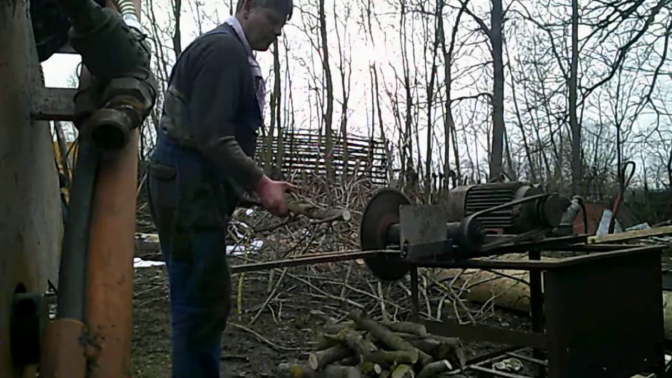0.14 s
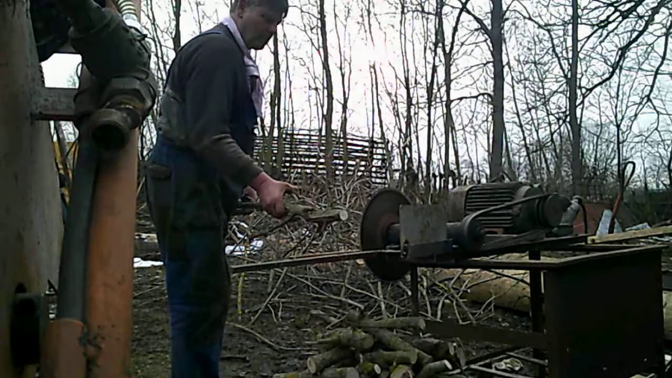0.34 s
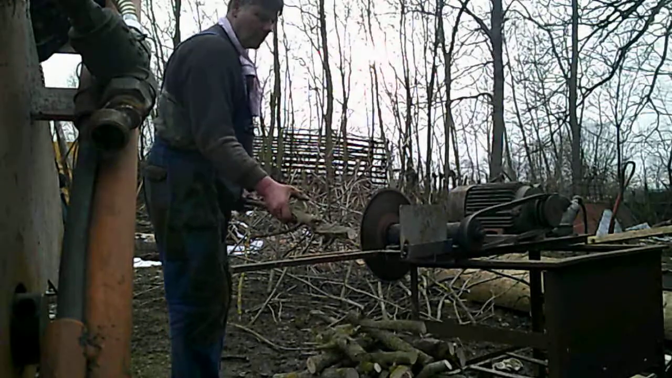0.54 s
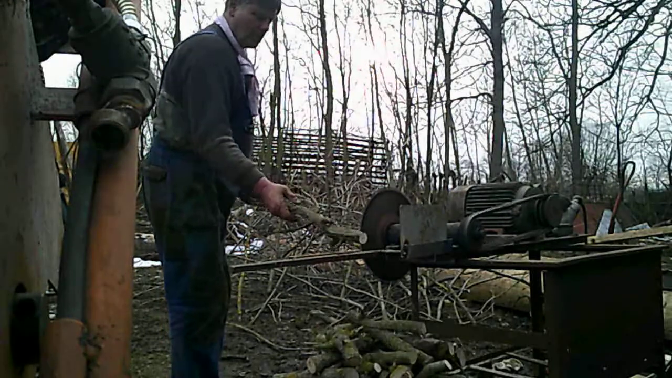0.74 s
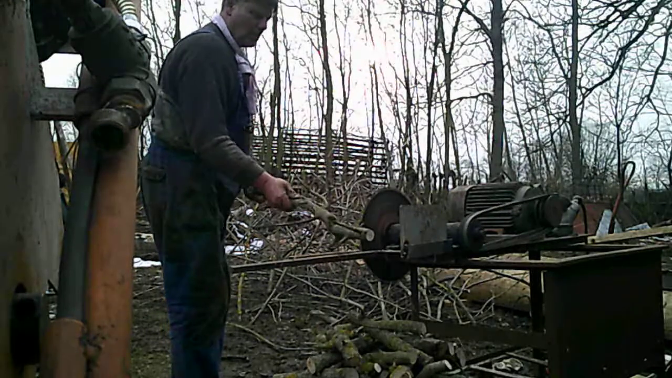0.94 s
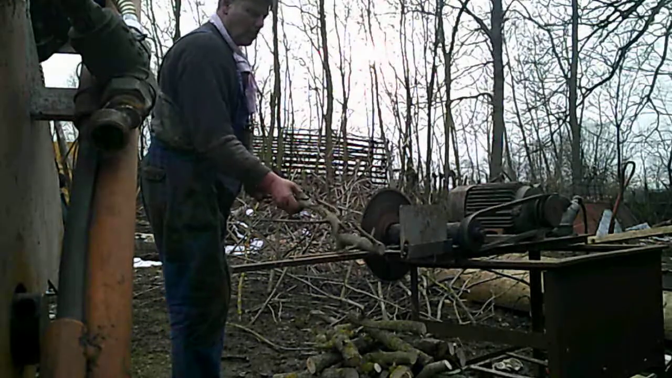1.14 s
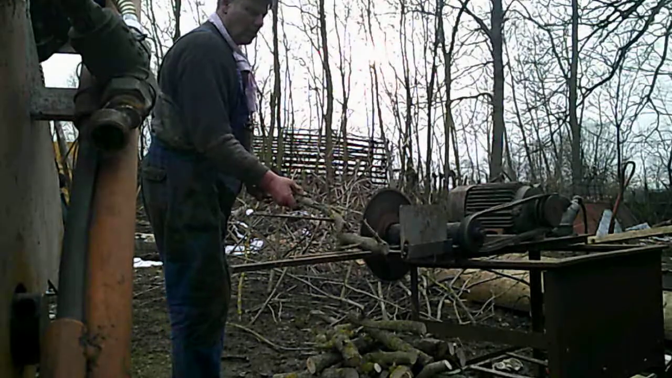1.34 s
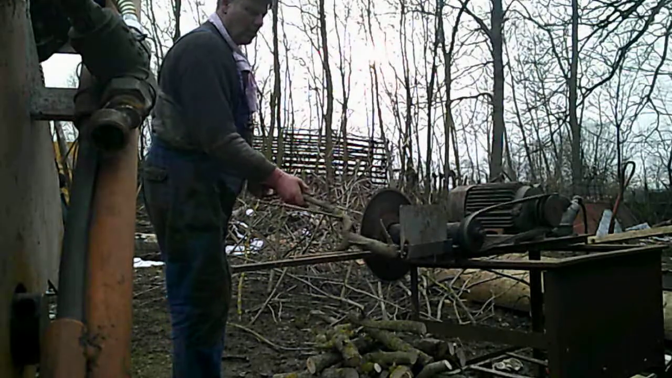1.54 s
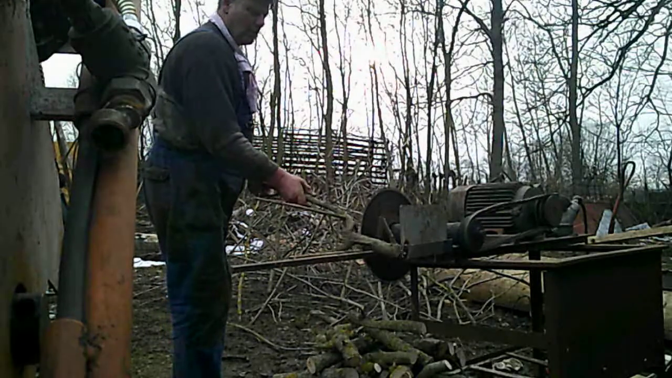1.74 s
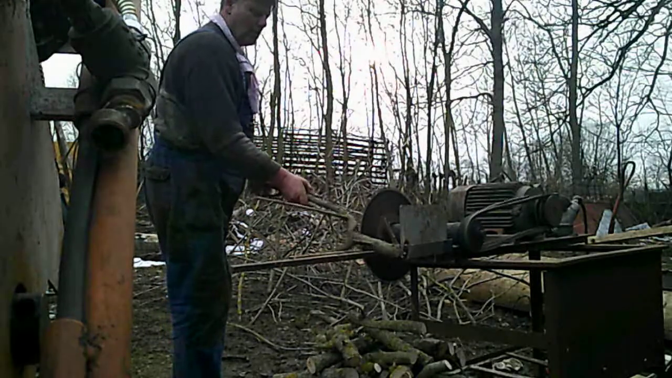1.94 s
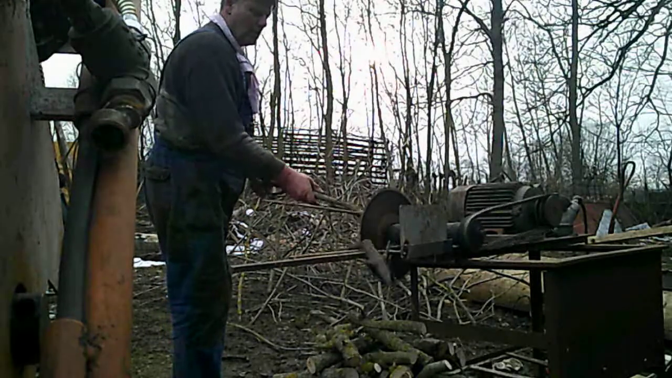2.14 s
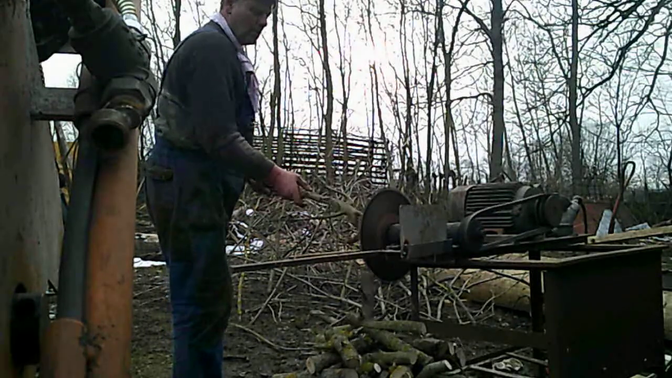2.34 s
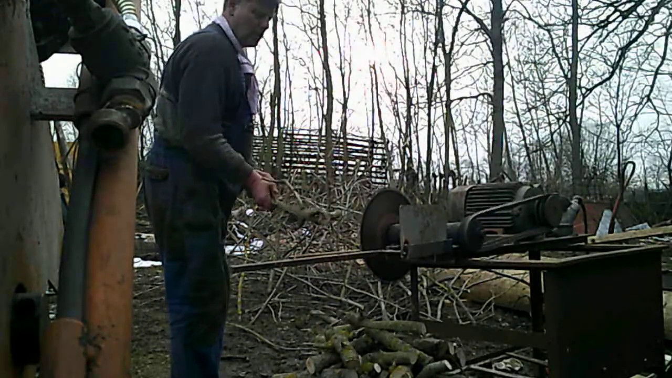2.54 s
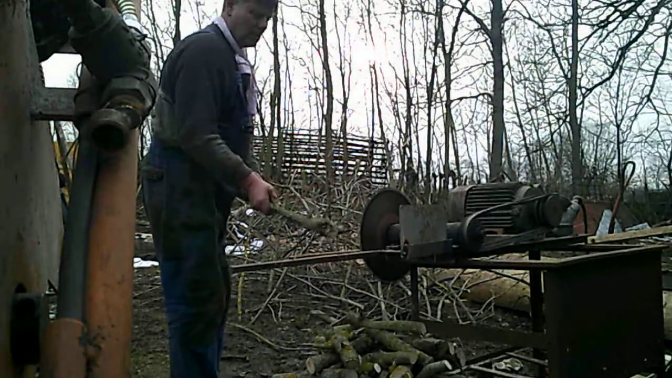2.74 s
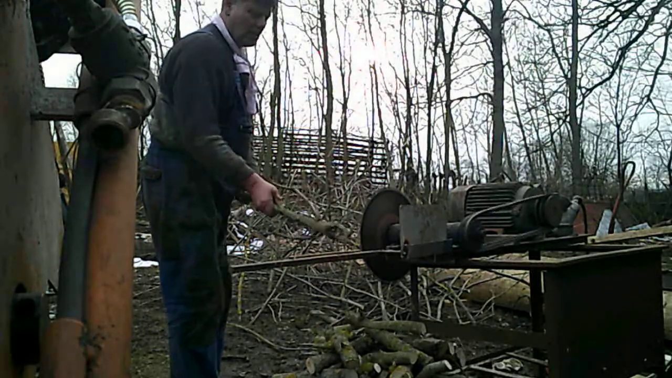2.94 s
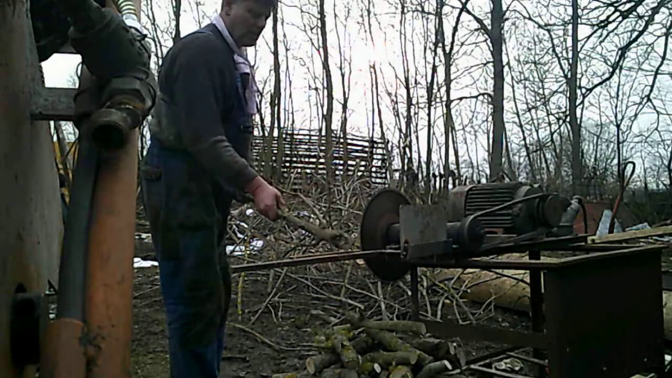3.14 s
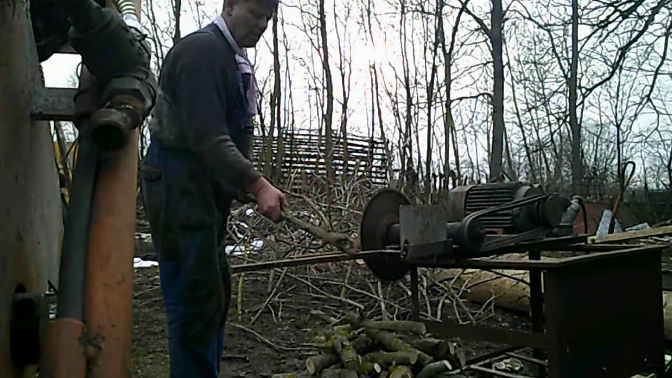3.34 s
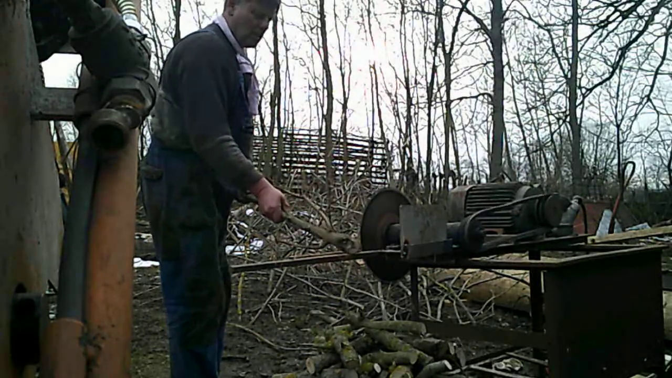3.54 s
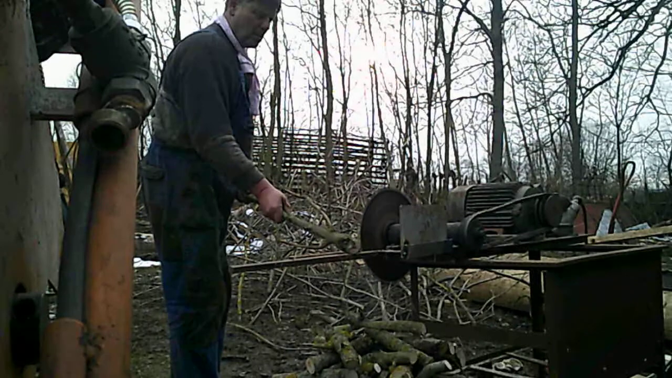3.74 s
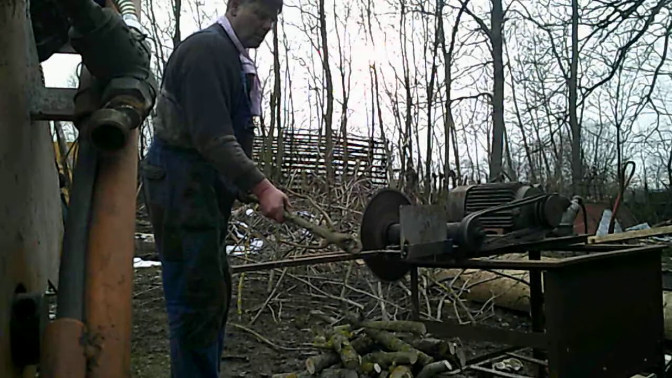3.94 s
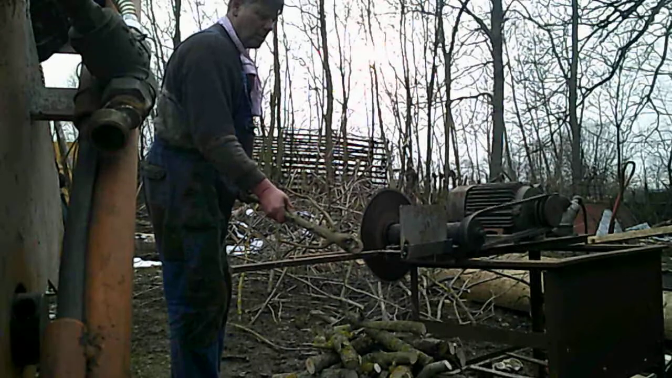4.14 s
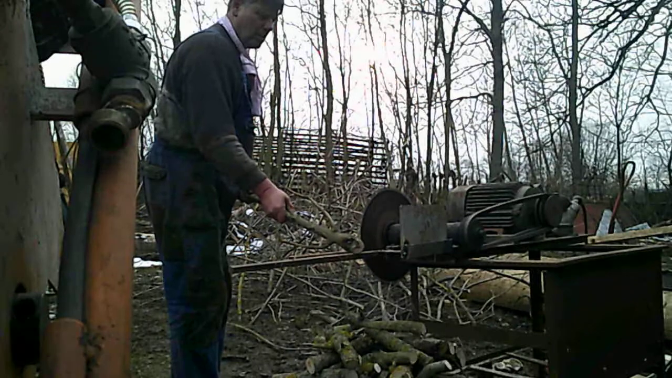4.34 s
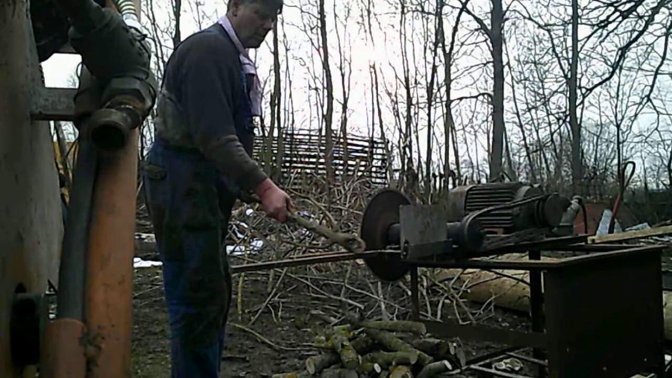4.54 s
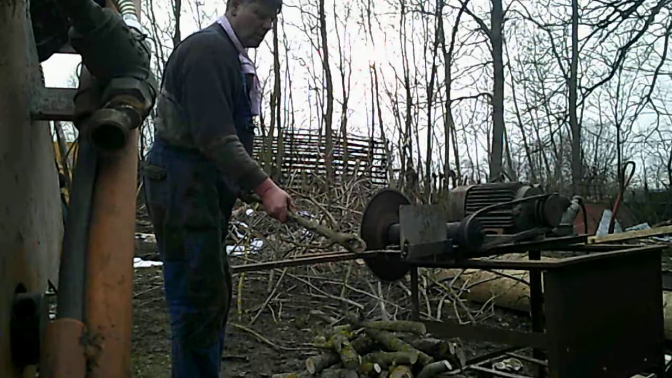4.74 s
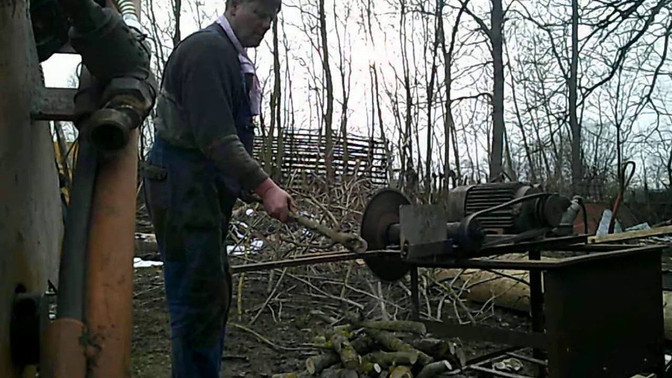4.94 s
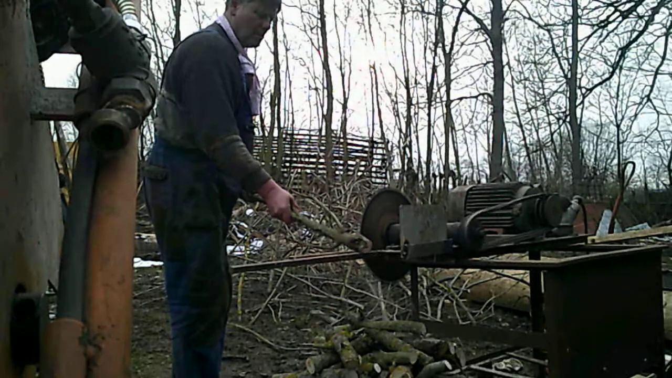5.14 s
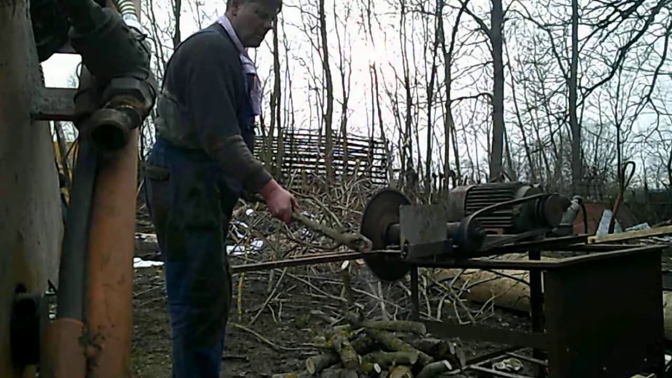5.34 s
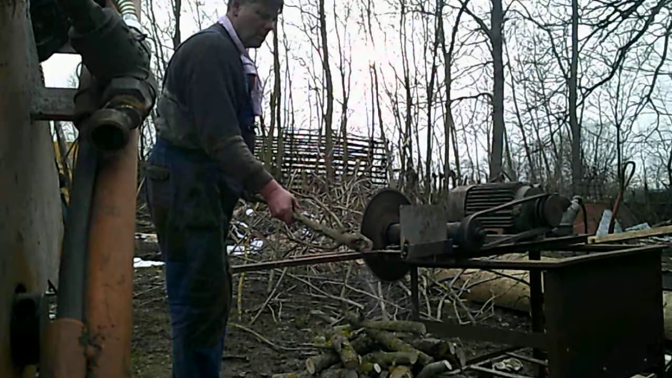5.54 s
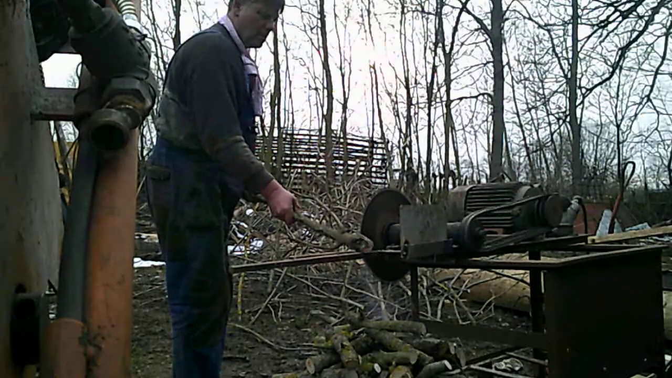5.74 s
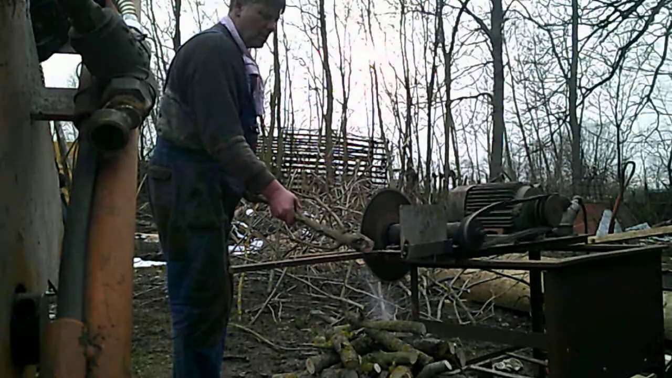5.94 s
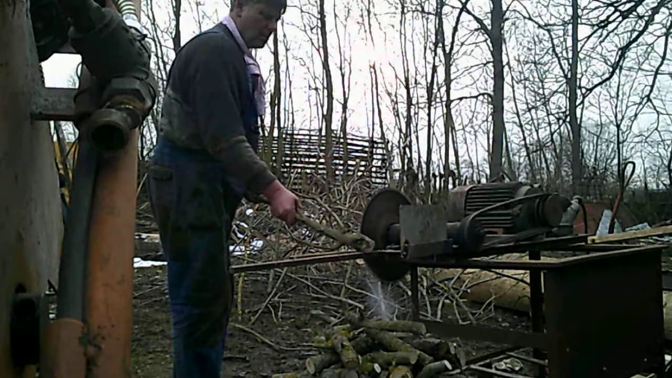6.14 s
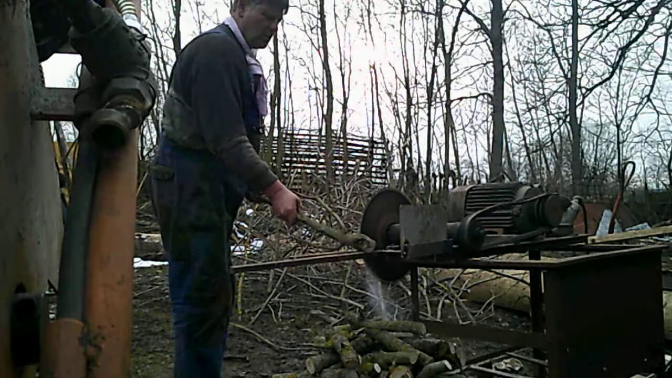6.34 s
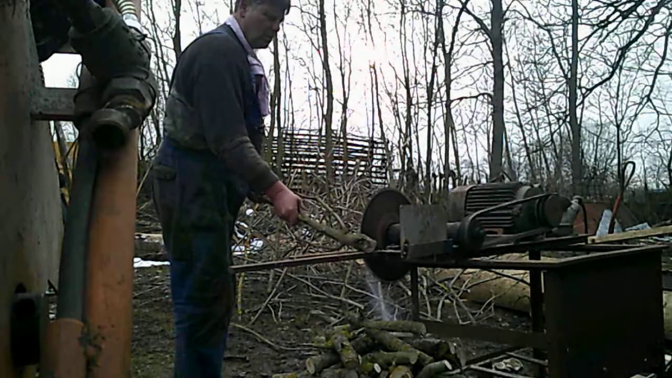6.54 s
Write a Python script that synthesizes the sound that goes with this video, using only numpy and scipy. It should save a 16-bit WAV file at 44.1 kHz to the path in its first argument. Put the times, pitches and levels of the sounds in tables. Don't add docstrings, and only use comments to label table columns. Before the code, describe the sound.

A belt-driven circular saw spins freely, quiet and faintly singing, with a tiny tick of grit. Two brief abrasive cuts leap out, the second ending in a clear metallic ring that slowly fades. Then a long, rough cut through thicker wood: toothy repeating buzz, humming frame, wavering squeals and gritty chip hiss, still going at the close. Open yard, slight lingering echo, modest small microphone.

```python
import sys
import numpy as np
from scipy import signal
from scipy.fft import rfft, irfft, next_fast_len
from scipy.io import wavfile
from scipy.ndimage import uniform_filter1d, map_coordinates

SR = 44100
rng = np.random.default_rng(int(sys.argv[2]) if len(sys.argv) > 2 else 0)


def ratio(d):
    e = np.asarray(d, float) / 20
    return 10 ** e


def to_wav(sig):
    pcm = np.clip(np.atleast_2d(sig), -1, 1) * 32767
    pcm = np.round(pcm).astype(np.int16)
    wavfile.write(sys.argv[1], SR, pcm.T)


N = 294347
TIME = np.arange(N) / SR

HISS_DB = -97
WHIR_DB, LEFTOVER_DB, LEFTOVER_S = -42.5, 3, 0.12
RUMBLE_DB, RUMBLE_LOAD_DB, RUMBLE_DRIFT_DB = -50.5, 1.5, 0.4
UNBALANCE_HZ, UNBALANCE_DB = 29.6, -58.5
FIRST_CUT_TURNS = 29.1
FEED_DB = -66
PATTERN_PINCH = 0.0029
GROUP_DB, GROUP_FOLLOWS = -68.5, 0.5

# (frequency [Hz], level [dB])
MIC_DIP = [(3950, 0), (4120, -8), (4600, 1), (5000, -0.5)]
# (frequency [Hz], decay t60 [s])
AFTERGLOW = [(500, 1.2), (1500, 0.98), (3000, 1.1), (4000, 0.79), (4900, 0.28), (5400, .45), (6400, 0.34),
             (7000, 0.27), (8500, 0.05)]

# (frequency [Hz], density [dB per Hz])
RUMBLE = [(7.1, -39), (12, 6.5), (34, -3.5), (54, -7.5), (193, -19.5), (212, -35), (260, -29.5), (340, -46),
          (570, -120)]
WHIR = [(88, -47.5), (150, -18.5), (375, -16.5), (439, -13.5), (611, -18), (965, -3.5), (1250, -6),
        (1480, 2), (1810, -8.5), (1980, -12.5), (2220, -15), (2410, -8), (2590, -17), (3040, -19),
        (4600, -65.5), (5980, -88), (10100, -120)]
# (width [Hz], level [dB])
FREE_HZ = [188, 436, 873, 985, 1104, 1217, 1312, 1341, 1428, 1945, 2067, 2186, 2358, 2406, 2585, 3740, 3833,
           3915]
FREE = [(7.9, 4.1), (9.1, 13.3), (16.6, 5.5), (11.8, 11), (13, 6.5), (5, 11), (6.1, 2.2), (6.2, 1.9),
        (5, 3.9), (22, 12), (8.2, 7.9), (12, 10), (7, 14.7), (5, 7.9), (7.7, 2.7), (80, 6.3), (10, 8),
        (11, 9.7)]
# (frequency [Hz], level [dB])
WHINE = [(2358, -63), (2406, -61.5)]
# (time [s], peak level [dB])
TICKS = [
    (0.0732, -85),
    (0.585, -76),
]

# (frequency [Hz], knocks of (time [s], half length [s], level [dB]))
FRAME = (232, [(1.5, 0.047, -51), (1.88, 0.056, -59.5), (1.74, 0.12, -63.5)])
# (time [s], speed [turns per s])
SPEED = [(3.25, 29.56), (3.8, 29.48), (4.4, 29.42), (4.8, 29.36), (5.2, 29.27), (5.6, 29.2), (6.0, 28.97),
         (6.4, 28.74), (6.67, 28.6)]
# order [multiple], and their level at rest [dB]
CLEAR_ORDERS = [8, 11, 15, 16]
HUM_DB = [-73, -77.5, -62, -63]
# (frequency [Hz], width [Hz], level [dB])
TUNED = [(231.96, 4.7, 16.5), (314.3, 3.4, 17)]
# (time [s], half length [s], level [dB])
SWELLS_15 = [(3.33, 0.02, -50), (3.6, 0.1, -49.5), (3.82, 0.096, -52.5), (4.2, 0.18, -51.5),
             (4.62, 0.2, -51.5), (4.92, .05, -66), (5.8, 0.076, -48), (6.1, 0.13, -49.5), (6.6, 0.39, -56)]
SWELLS_16 = [(3.55, .08, -58), (4.08, 0.11, -52.5), (4.5, 0.19, -59), (4.85, 0.1, -50), (5.35, 0.22, -53.5),
             (5.6, 0.095, -52.5), (6.65, 0.13, -60)]
# (time [s], half length [s], lift [dB])
GROUP_SWELLS = [
    (5.549, 0.27, 6),
    (6.08, .2, 9),
]

# (time [s], half length [s], level [dB], frequency [Hz])
SQUEALS = [(1.505, .06, -39, 2950), (1.522, .08, -42, 2380), (3.72, 0.18, -40.5, 2950),
           (3.76, 0.1, -37.5, 2359), (4.55, .12, -42, 2410), (4.95, .06, -48, 2410),
           (5.17, 0.14, -42, 2955), (5.3, .2, -35, 1583), (5.38, 0.13, -39, 1434), (6.35, .12, -41, 1437)]
# (time [s], level [dB])
RELEASE = (2.03, -36)
# (level [dB], decay t60 [s])
RING_HZ = [877, 985, 1157, 1217, 1324, 1443, 1604, 1900, 1954, 2051, 2358, 2406, 2476, 2891, 2950, 3268,
           3424, 3833, 4011]
RING = [(-12, 1.7), (-7, 0.9), (-4.5, 2.1), (-1, 3.3), (-5.5, 1.6), (-6.5, 3.8), (-9.5, 2.2), (-7, 1.6),
        (-15, 3.3), (-19.5, 3), (-3.5, 3.8), (-3.5, 2), (-13.5, 2.7), (-19, 0.9), (-11, 1.2), (-20, 0.56),
        (-26.5, 1.6), (-34.5, 1.1), (-22.5, 0.48)]
# (level [dB], decay t60 [s], colour of (frequency [Hz], density [dB per Hz]))
SHIMMER = (-84.5, 2.2, [(4900, -35), (5300, -1), (5600, 0.5), (6300, -1.5), (6700, -30.5)])

# (width [Hz], level [dB])
LOADED_HZ = [232, 440, 985, 1141, 1216, 1322, 1437, 1583, 1653, 1903, 1965, 2056, 2359, 2407, 2891, 2950,
             3268, 3420, 3655, 3833, 3908, 4011]
LOADED = [(15, -1.5), (60, -2), (13, 4), (20, -2.5), (31, 8), (50, 3.5), (25.4, 5.5), (24.4, 14), (20, 7),
          (17, 10.5), (20, 8.5), (24, 3.5), (10, 12), (10.2, 12.5), (21.3, 8.5), (20.1, 7.5), (14, -3.5),
          (18, 10.5), (20, 1), (20, 10.5), (15, 4), (22, 12)]
# (frequency [Hz], density [dB per Hz])
THICK_BODY = [(71, -36), (120, -30.5), (233, -19), (350, -21.5), (435, -2), (503, -5.5), (1050, -1.5),
              (1360, -37.5), (2310, -120)]
THICK_BITE = [(560, -39.5), (950, -13.5), (1080, -11.5), (1310, 6.5), (1610, -6.5), (1780, -14),
              (1850, -24.5), (2400, -57.5), (4070, -120)]
THICK_UPPER = [(1030, -34.5), (1750, -19), (1970, -1), (2250, -7.5), (2400, 0.5), (2600, -0.5), (2980, -3),
               (3230, -10.5), (4400, -31.5), (5720, -57), (9680, -120)]
# (frequency [Hz], density [dB per Hz])
THIN_BODY = [(88, -54), (150, -24), (233, -19), (270, -25), (350, -29), (422, 5), (609, -4.5), (843, -1),
             (1050, -2), (1360, -34), (2310, -120)]
THIN_BITE = [(560, -33.5), (950, -6), (1090, -3.5), (1310, 8), (1630, -7.5), (1770, -18), (1850, -16),
             (2400, -53.5), (4070, -120)]
THIN_UPPER = [(1030, -43.5), (1750, -15), (1910, -3.5), (2220, -9.5), (2390, -1), (2600, -2), (2990, -4.5),
              (3230, -12.5), (4400, -33), (5720, -67), (9680, -120)]
# (frequency [Hz], density [dB per Hz])
CHIPS = [(2410, -33.5), (4100, 6), (4240, -21), (4840, -4), (5370, 7), (6300, 1), (7590, 5.5), (8670, -6),
         (8930, -31), (11600, -54.5), (19600, -120)]
# (frequency [Hz], width [Hz], level [dB])
CHIP_PEAKS = [(4270, 22, -12.5), (4500, 53, 6), (5250, 63, -6.5), (5900, 250, -3), (6670, 77, -2.5),
              (7455, 110, -0.5), (8350, 180, -22.5)]
# (time [s], feed [dB])
THIN = [
    (1.385, -85.5),
    (1.41, -69),
    (1.475, -56),
    (1.62, -63.5),
    (1.71, -59.5),
    (1.8, -66.5),
    (1.975, -52.5),
    (2.03, -60.5),
    (2.09, -86.5),
]
THICK = [
    (3.25, -100),
    (3.29, -74.5),
    (3.32, -69.5),
    (3.9, -66.5),
    (4.04, -68.5),
    (5.08, -67),
    (5.11, -63.5),
    (6.34, -67),
    (6.67, -63.5),
]
# (time [s], half length [s], disc [dB], upper disc [dB])
PINCHES = [(1.477, 0.014, 4.5, 2.5), (1.528, .015, 5.5, 2), (1.575, .02, 6.5, 3), (1.697, 0.043, -1.5, -2),
           (1.903, .03, -2.5, -1), (2.021, 0.026, 7, 1), (2.085, 0.044, 17.5, 14.5),
           (1.409, .025, 2.5, 1.5), (3.336, 0.038, 4, 0.5), (3.698, 0.17, 3, 3.5), (3.972, .08, -2.5, -5),
           (4.5, 0.16, 0, 0.5), (4.815, .12, 3.5, 1), (5.103, 0.033, 4.5, 0.5), (5.182, 0.018, -4, -3),
           (5.357, 0.17, 6.5, 1.5), (5.609, 0.088, 2, 2), (5.795, .04, 4.5, -0.5), (6.122, 0.19, -1, -3),
           (6.335, .1, 3, 1.5)]
# (disc [dB], frame [dB], upper disc [dB],
# chips [dB], frame's gain [dB per dB of feed], repeating share [0-1])
THIN_WOOD = (23.5, -43, 20, -0.5, 0.29, 0.3)
THICK_WOOD = (27, -50, 22.5, -0.5, 0.3, 0.89)


def unit(x):
    return x / np.sqrt(np.mean(x ** 2) + 1e-20)


def unit_gain(response):
    return response / np.sqrt(np.mean(np.abs(response) ** 2))


def along(points, hz):
    f, v = np.transpose(points)
    return np.interp(np.log(hz + 1), np.log(f + 1), v)


def curves(rows):
    s, *columns = np.transpose(rows)
    return [np.interp(TIME, s, column) for column in columns]


def wobble(rate):
    knots = rng.standard_normal(int(N * rate / SR) + 4)
    return map_coordinates(knots, [np.arange(N) * rate / SR])


def bumps(rows):
    return [np.exp(-((TIME - row[0]) / row[1]) ** 2) for row in rows]


def swells(rows):
    return sum(ratio(row[2]) * bell for row, bell in zip(rows, bumps(rows)))


def during(table, fade=0.003):
    start, end = table[0][0], table[-1][0]
    return np.interp(TIME, [start - fade, start, end, end + fade], [0, 1, 1, 0])


def modes(centres, shapes):
    return [(hz, *shape) for hz, shape in zip(centres, shapes)]


def coloured(x, spectrum, peaks=()):
    m = next_fast_len(N + SR)
    f = np.fft.rfftfreq(m, 1 / SR)
    lift = 1 + sum(ratio(db) * 1j * f * w / (c * c - f * f + 1j * f * w) for c, w, db in peaks)
    response = unit_gain(ratio(along(spectrum, f)) * lift)
    return irfft(rfft(x, m) * response, m)[:N]


def microphone_hiss():
    colour = [(3500, -23.0), (4500, 7.0), (8000, 6.5), (9000, -9)]
    return ratio(HISS_DB) * coloured(rng.standard_normal(N), colour)


def afterglow(x):
    hz, t, z = signal.stft(rng.standard_normal(SR), SR, nperseg=256)
    decay = ratio(-60 * t / along(AFTERGLOW, hz)[:, None])
    tail = signal.istft(z * decay, SR, nperseg=256)[1]
    return signal.fftconvolve(x, tail / np.linalg.norm(tail))[:N]


def idle():
    whir_db = WHIR_DB + LEFTOVER_DB * np.exp(-TIME / LEFTOVER_S)
    whir = coloured(rng.standard_normal(N) * ratio(0.43 * wobble(30)), WHIR, modes(FREE_HZ, FREE))
    rumble_db = RUMBLE_DB + RUMBLE_LOAD_DB * during(THICK, fade=0.5) + RUMBLE_DRIFT_DB * wobble(1.3)
    rumble = coloured(rng.standard_normal(N), RUMBLE)
    throb = ratio(UNBALANCE_DB + 2.5 * wobble(3.2)) * np.sin(2 * np.pi * UNBALANCE_HZ * TIME)
    whine = 0
    for hz, db in WHINE:
        tone = np.sin(2 * np.pi * (hz * TIME + 0.062 * wobble(11)))
        whine = whine + ratio(db + 1.5 * wobble(11)) * tone
    return whine + ratio(whir_db) * whir + ratio(rumble_db) * rumble + throb


def ticks():
    out, t = np.zeros(N), np.arange(SR // 50) / SR
    ping = np.sin(2 * np.pi * 6200 * t) * (1 - np.exp(-t / 0.00043))
    for s, db in TICKS:
        out[round(s * SR):][:len(t)] += ratio(db + 4 - 60 * t / 0.012) * ping
    return out


def frame():
    hz, knocks = FRAME
    tone = np.sin(2 * np.pi * (hz * TIME + 0.06 * wobble(16)))
    return during(THIN) * swells(knocks) * tone


def orders(turns, speed):
    def frame_lift(f):
        return 1 + sum(ratio(db) / (1 + (2 * (f - hz) / w) ** 2) ** 2 for hz, w, db in TUNED)

    def tone(k):
        return np.sqrt(2) * np.sin(2 * np.pi * (k * turns + rng.random()))

    gains = [ratio(db) * frame_lift(k * speed) for k, db in zip(CLEAR_ORDERS, HUM_DB)]
    gains[2] = gains[2] + swells(SWELLS_15)
    gains[3] = gains[3] + swells(SWELLS_16)
    hum = sum(gain * ratio(1.2 * wobble(11)) * tone(k) for k, gain in zip(CLEAR_ORDERS, gains))
    group_db = GROUP_DB + GROUP_FOLLOWS * (curves(THICK)[0] - FEED_DB)
    group_db = group_db + np.transpose(GROUP_SWELLS)[2] @ bumps(GROUP_SWELLS)
    group = sum(ratio(group_db - 1.5 + 3 * wobble(1.2) + 3.3 * wobble(3.9)) * tone(k) for k in range(18, 24))
    return (hum + group) * during(THICK)


def squeals():
    out = 0
    for row in SQUEALS:
        tone = np.sin(2 * np.pi * (row[3] * TIME + 0.12 * wobble(22)))
        out = out + swells([row]) * ratio(2.3 * wobble(25)) * tone
    return out


def ring_out():
    release_s, release_db = RELEASE
    t = np.maximum(TIME - release_s, 0)
    low = 0
    for hz, (db, t60) in zip(RING_HZ, RING):
        tone = np.sin(2 * np.pi * (hz * t + rng.random() + 0.013 * wobble(8)))
        low = low + ratio(db - 60 * t / t60 + 0.61 * wobble(3.4)) * tone
    db, t60, colour = SHIMMER
    high = ratio(db - 60 * t / t60) * coloured(rng.standard_normal(N), colour)
    return (ratio(release_db) * low + high) * (1 - np.exp(-t / 0.012))


def teeth(turns, memory, size):
    keep = np.clip(memory, 0, 0.99)
    fresh = rfft(rng.standard_normal((int(turns[-1]) + 40, size)))
    lines = signal.lfilter([1], [1, -keep], fresh, axis=0)
    lines = lines / np.sqrt(np.abs(uniform_filter1d(np.abs(lines) ** 2, size=6, axis=1)))
    lines[:, CLEAR_ORDERS] *= 0.15
    pattern = irfft(lines, size)[-int(turns[-1]) - 2:].ravel()
    return unit(map_coordinates(pattern, [turns * size], order=3))


def cut(table, wood, turns, body, bite, upper, chatter_db):
    feed_db, = curves(table)
    pinch_db, upper_pinch_db = np.transpose(PINCHES)[2:] @ bumps(PINCHES)
    bite_db, body_db, upper_db, chip_db, follows, share = wood
    share = np.clip(share + PATTERN_PINCH * pinch_db, 0, 0.98)
    repeating, random = np.sqrt(share), np.sqrt(1 - share)
    push = during(table) * ratio(feed_db)
    splinter = unit(rng.standard_normal(N) * ratio(1.1 * wobble(60)))
    runout = 1 + 0.16 * np.cos(2 * np.pi * turns) + 0.062 * np.cos(np.pi * turns)
    force = push * runout * (repeating * teeth(turns, memory=0.848, size=700) + random * splinter)
    shake = 0.43 * repeating * teeth(turns, memory=0.95, size=100) + 0.7 * random * splinter
    chatter = ratio(chatter_db * (wobble(110) + wobble(25) - np.abs(wobble(45))))
    chips = unit(chatter) * (0.61 * force + 0.63 * push * rng.standard_normal(N))
    rough = 0.74 * force + 0.49 * push * splinter
    slow_feed_db = uniform_filter1d(feed_db - FEED_DB, size=SR // 8)
    load = during(table) * ratio(body_db - 5 + follows * slow_feed_db)
    steel = modes(LOADED_HZ, LOADED)
    disc = coloured(force * ratio(bite_db + pinch_db), bite, steel)
    upper_disc = coloured(rough * ratio(upper_db + upper_pinch_db), upper, steel)
    table_frame = coloured(shake * load, body, steel)
    hiss = coloured(chips * ratio(chip_db), CHIPS, [(hz, w, db + 7.0) for hz, w, db in CHIP_PEAKS])
    return disc + upper_disc + table_frame + hiss


def scene():
    speed, = curves(SPEED)
    turns = np.cumsum(speed) / SR
    thin_turns = TIME * FIRST_CUT_TURNS
    thin = cut(THIN, THIN_WOOD, thin_turns, THIN_BODY, THIN_BITE, THIN_UPPER, chatter_db=1.5)
    thick = cut(THICK, THICK_WOOD, turns, THICK_BODY, THICK_BITE, THICK_UPPER, chatter_db=0.7)
    cuts = thin + thick
    saw = cuts + ratio(-11) * afterglow(cuts) + orders(turns, speed) + ring_out() + frame() + squeals()
    return (saw + idle() + ticks() + microphone_hiss())[None]


def band_limit(x):
    return signal.sosfilt(signal.butter(12, 9080, fs=SR, output="sos"), x)


def record(dry):
    m = next_fast_len(N + SR // 4)
    response = ratio(along(MIC_DIP, np.fft.rfftfreq(m, 1 / SR)))
    heard = irfft(rfft(dry, m) * response, m)[:, :N]
    return band_limit(heard)


dry = scene()
out = record(dry)
to_wav(out)
```